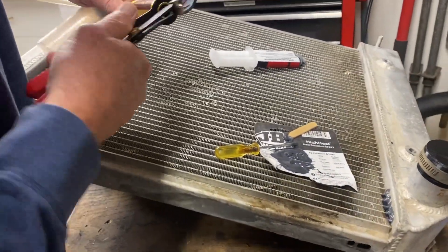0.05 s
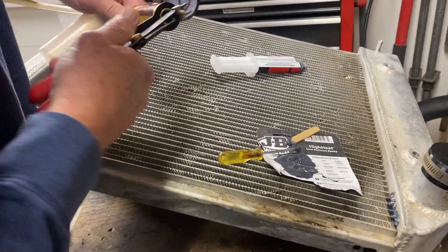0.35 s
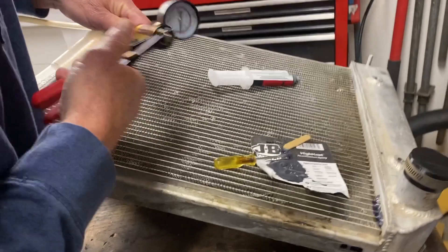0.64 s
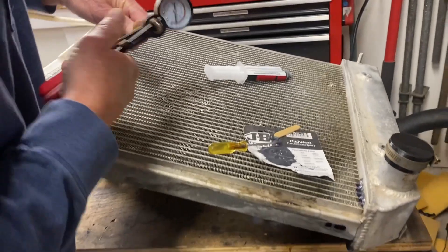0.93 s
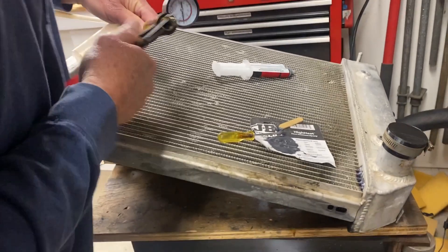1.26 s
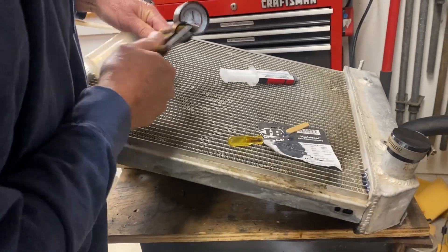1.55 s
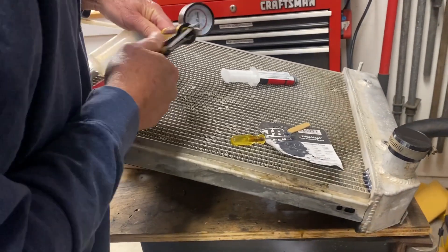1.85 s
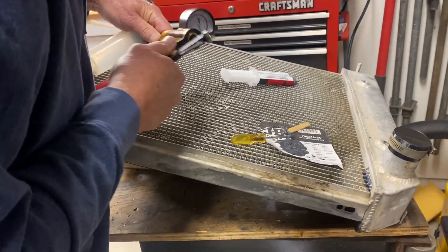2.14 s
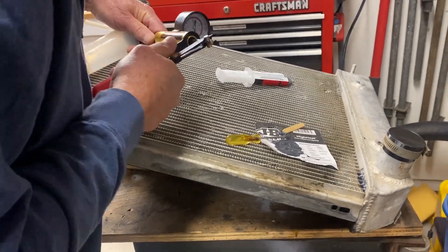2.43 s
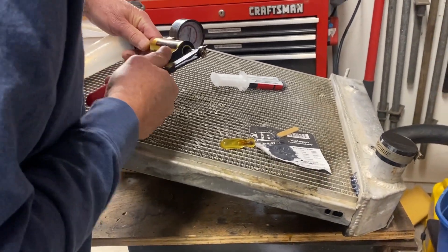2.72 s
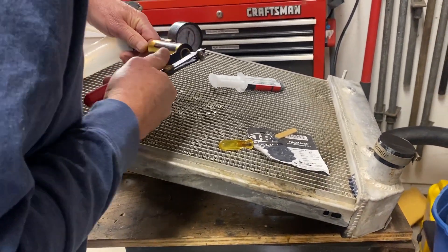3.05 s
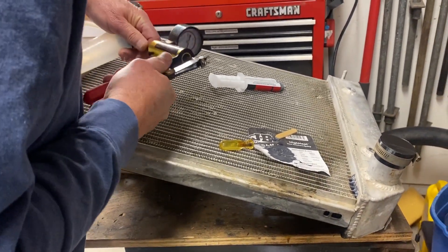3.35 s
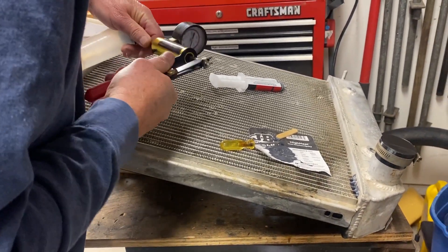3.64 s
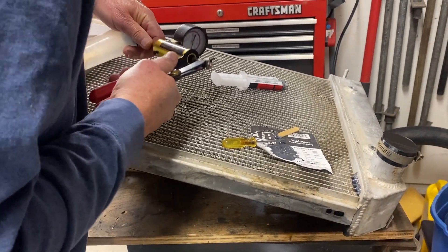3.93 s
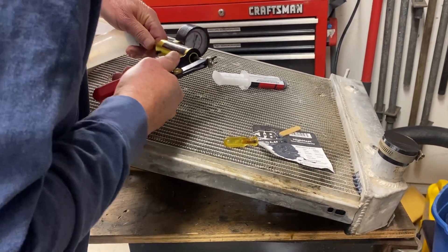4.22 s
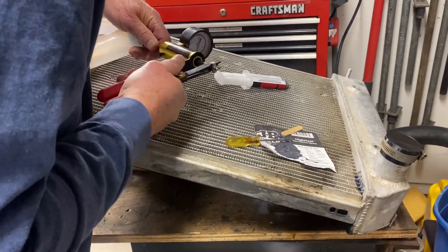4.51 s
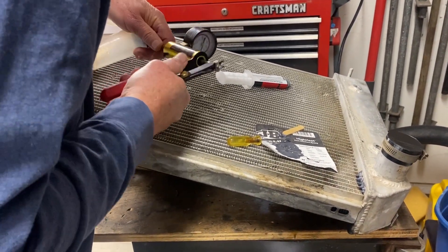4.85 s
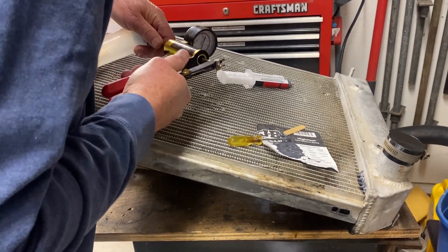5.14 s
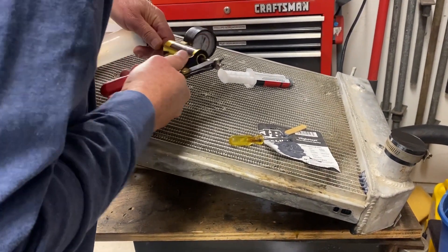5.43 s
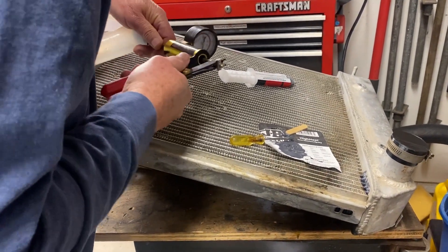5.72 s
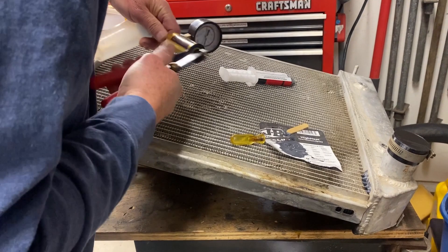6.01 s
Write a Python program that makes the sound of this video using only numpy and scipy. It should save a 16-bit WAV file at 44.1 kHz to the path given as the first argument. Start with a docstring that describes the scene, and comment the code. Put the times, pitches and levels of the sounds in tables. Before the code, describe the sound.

Steady, rapid popping clicks from a hand-worked vacuum pump, with brief air hisses and a faint spring ring, in a small room.

```python
"""A hand vacuum pump, hooked to an aluminium radiator on a workbench, is worked about 3.5 times a second.
On each release a spring drives the piston back: air hisses in through a lengthening chamber, then the
piston pops home with a metal clack and the spring rings. Each squeeze vents the chamber; most bring a
softer knock. As the vacuum builds, the pops rise in pitch and the air sounds fade. Sleeve and hands
rustle, the radiator now and then scrapes on the bench, and the small workshop reverberates."""
import sys
import numpy as np
from scipy import signal
from scipy.fft import rfft, irfft, next_fast_len
from scipy.io import wavfile
from scipy.ndimage import uniform_filter1d

SR = 44100
rng = np.random.default_rng(int(sys.argv[2]) if len(sys.argv) > 2 else 0)


def digitize_waveform(pressure):
    """Quantize a signal to 16-bit integers and store it at the path in sys.argv[1].

    Rows of a 2-D input are taken as channels; values are limited to [-1, 1].
    """
    field = np.atleast_2d(pressure).T
    bounded = np.clip(field, -1, 1)
    quanta = np.round(bounded * 32767).astype(np.int16)
    wavfile.write(sys.argv[1], SR, quanta)


N = 276507
TIME = np.arange(N) / SR
SIDES = np.array([[.5], [-.5]])  # splits a left-right difference between the channels

# piston landings: start_s, pop_db, clack_db, spring_db, hand_rub_db
STROKES = [(0.1076, -16, -29.5, -53, -62.5), (0.3689, -14, -29, -50.5, -54),
           (0.636, -16.5, -30.5, -53, -73), (0.9134, -14.5, -30, -60, -52), (1.1806, -16.5, -32, -53, -81),
           (1.4414, -13.5, -31, -60, -53.5), (1.7297, -15, -31, -45.5, -72), (1.9965, -17, -32, -52, -62),
           (2.2757, -18.5, -34.5, -48.5, -52.5), (2.5693, -16.5, -34, -52, -56),
           (2.8615, -16, -31, -50, -43), (3.163, -19.5, -34.5, -56, -53.5), (3.4701, -17, -31.5, -52, -61),
           (3.7709, -19, -34.5, -49.5, -65), (4.0575, -19, -31.5, -43, -59),
           (4.3476, -18.5, -31.5, -51.5, -60), (4.6474, -20, -35, -49, -58),
           (4.967, -21.5, -40, -50.5, -59.5), (5.265, -19.5, -34.5, -50.5, -53.5),
           (5.578, -20.5, -37.5, -54, -64), (5.9125, -19, -35, -47, -62), (6.231, -20.5, -38, -48.5, -58)]
# knocks of handle and valve as the grip closes: start_s, knock_db, rasp_db
SQUEEZES = [(0.23, -31.5, -48), (0.46, -38, -43.5), (0.478, -43, -35), (0.511, -32, -32),
            (0.762, -33.5, -49), (1.044, -46, -41.5), (1.32, -44, -55.5), (1.509, -35.5, -59),
            (1.561, -39.5, -50), (1.574, -32.5, -45), (1.591, -38.5, -46.5), (2.113, -63, -51),
            (2.13, -54, -35), (2.394, -42, -41.5), (2.411, -31.5, -38), (2.644, -37.5, -51.5),
            (2.689, -44, -37.5), (2.703, -44, -35), (3.299, -31, -46), (3.602, -30, -42), (3.892, -31, -47),
            (4.184, -30, -41.5), (4.475, -30.5, -50.5), (4.775, -29, -41.5), (4.785, -31.5, -43.5),
            (4.901, -43.5, -53.5), (5.048, -38.5, -57), (5.086, -32, -51.5), (5.411, -50, -34),
            (5.72, -32.5, -43.5), (6.05, -31, -46.5), (6.061, -35, -55)]


def amp(db):
    """Decibels to amplitude ratio."""
    return 10 ** (np.asarray(db) / 20)


def unit(x):
    """Normalisation to an rms of 1."""
    return x / np.sqrt(np.mean(x ** 2) + 1e-20)


def log_curve(points, hz):
    """Interpolation on a logarithmic frequency axis."""
    f, value = np.transpose(points)
    return np.interp(np.log(hz + 1), np.log(f + 1), value)


def curve(points, at):
    """Linear interpolation in a two-column table."""
    return np.interp(at, *np.transpose(points))


def add(mix, s, sound):
    """Superposition of a sound starting at time s."""
    part = mix[max(round(s * SR), 0):][:len(sound)]
    part += sound[:len(part)]


def slow_noise(size, span):
    """Noise low-passed by a moving average over span samples, at rms 1."""
    return unit(uniform_filter1d(rng.standard_normal(size), span))


def colour(x, spectrum, size=2048):
    """Minimum-phase filter with this spectral shape and a power gain of 1."""
    gain = unit(amp(log_curve(spectrum, abs(np.fft.fftfreq(size, 1 / SR)))))
    taps = np.fft.ifft(np.exp(signal.hilbert(np.log(gain)).conj())).real
    return signal.oaconvolve(x, taps[:size // 2])[:len(x)]


def resonate(x, hz, width_hz):
    """A damped resonator of peak gain 1 whose frequency may move."""
    turn = np.exp(2j * np.pi * np.cumsum(hz * np.ones(len(x))) / SR)
    pole = np.exp(-np.pi * width_hz / SR)
    return 2 * (turn * signal.lfilter([1 - pole], [1, -pole], x / turn)).real


def by_vacuum(law, s, evacuate_s=3.54):
    """Exponential evacuation: law is (starting value, change at full vacuum), read at time s."""
    start, change = law
    return start + change * (1 - np.exp(-s / evacuate_s))


def puff(t, hz, rise_s, sag, hold_s=.0046):
    """Chamber air oscillates briefly, sinks in pitch and is choked off; a small port radiates no bass."""
    envelope = (1 - np.exp(-t / rise_s)) * np.exp(-(t / hold_s) ** 4)
    pitch = hz * np.exp(-sag * (t / hold_s - .5))
    air = np.sqrt(2) * envelope * np.cos(2 * np.pi * np.cumsum(pitch) / SR)
    return signal.sosfilt(signal.butter(3, 620, "high", fs=SR, output="sos"), air)


def diffuse_noise(size):
    """A diffuse field is only partly coherent at two points: left and right noise."""
    # likeness of the two sides: frequency_hz, coherence
    coherence = [(60, 0.93), (400, 0.83), (1000, 0.31), (2000, 0.12), (5000, 0.13), (8000, 0.33),
                 (15000, 0.55)]
    a, b = rfft(rng.standard_normal((2, size)))
    same = np.clip(log_curve(coherence, np.fft.rfftfreq(size, 1 / SR)), -1, 1)
    return irfft(np.array([a, same * a + np.sqrt(1 - same ** 2) * b]), size)


def handling(tightest_s=.13, grip_width_s=.053, sway_db=5, rest_db=-72, uneven_db=2, crackle_db=4):
    """Contact noise: the handled microphone rumbles, sleeve and hands rustle; both swell each squeeze."""
    # rumble and rustle spectra: frequency_hz, density_db
    rumble_spectrum = [(20, -10), (55, 2.5), (85, 0), (180, 0.5), (300, 2.5), (500, -18), (1000, -1.5),
                       (4000, -70)]
    rustle_spectrum = [(100, -44), (500, 10), (950, 15), (1600, 14.5), (2500, 9.5), (3700, -4), (4600, 3),
                       (7000, 0.5), (10000, 1), (13000, -13), (16000, -36)]
    # low handling rumble on the microphone, strongest at the start and swelling as the radiator
    # scrapes: time_s, level_db
    rumble_level = [(0.0, -63.5), (2.76, -79), (3.18, -67), (3.61, -79), (5.41, -77), (6.27, -78)]

    def layer(spectrum, level):
        lumps = unit(uniform_filter1d(slow_noise(N, 1100), 600))
        noise = np.array([colour(side, spectrum)[:N] for side in diffuse_noise(next_fast_len(N))])
        return unit(noise) * level * amp(uneven_db * lumps)

    grip, rub, t = np.zeros(N), np.zeros(N), TIME[:SR // 3]
    swell = np.exp(-((t - tightest_s) / grip_width_s) ** 2)
    for s, *_, rub_db in STROKES:
        add(grip, s, swell)
        add(rub, s, amp(rub_db - 3) * swell)
    slips = unit(amp(crackle_db * slow_noise(N, 90)))
    rumble = layer(rumble_spectrum, amp(curve(rumble_level, TIME) + 1 + sway_db * grip))
    return rumble + layer(rustle_spectrum, amp(rest_db) + rub * slips)


def valve_ticks(lead_s=.085, decay_s=.0025, tick_db=(-51, -9.5), uneven_db=3,
                squeak_hz=1780, width_hz=120, squeak_db=-64, squeak_s=.0064):
    """A light impact: as the grip lets go, the valve flap seats with a tick and a faint squeak."""
    # tick spectrum: frequency_hz, density_db
    spectrum = [(300, -20), (1000, -7), (1800, -4), (3500, -14), (6000, -4), (7500, 3), (9000, -8),
                (16000, -14)]
    tick, squeak, t = np.zeros(N), np.zeros(N), TIME[:SR // 20]
    swell = t / squeak_s * np.exp(1 - t / squeak_s)
    for s, *_ in STROKES:
        tick_gain, squeak_gain = amp(uneven_db * np.clip(rng.standard_normal(2), -2, 2))
        snap, rub = rng.standard_normal((2, len(t)))
        tone = unit(resonate(resonate(rub, squeak_hz, width_hz), squeak_hz, width_hz))
        add(tick, s - lead_s, tick_gain * amp(by_vacuum(tick_db, s)) * np.exp(-t / decay_s) * snap)
        add(squeak, s - lead_s, squeak_gain * amp(squeak_db) * swell * tone)
    return colour(tick, spectrum) + squeak


def hose_plops(swell_s=.0056, low_hz=125, drop_hz=1100, knock_db=-25, flow_decay_s=1.04):
    """Dispersion: valves and knocks jolt the hose, which passes highs first, so each plop falls."""
    # valve closures around each landing: offset_s, rest_db, full_flow_extra_db
    closures = [(-.085, -81, 28), (0, -66, 21.5), (.055, -60, 19.5)]
    out, t = np.zeros(N), TIME[:SR // 20]
    envelope = t / swell_s * np.exp(1 - t / swell_s)
    jolts = [(s + offset, db + flow_db * np.exp(-s / flow_decay_s))
             for s, *_ in STROKES for offset, db, flow_db in closures]
    jolts += [(s, db + knock_db) for s, db, _ in SQUEEZES]
    for s, db in jolts:
        pitch = low_hz + drop_hz * np.exp(-t / rng.uniform(.004, .00523))
        flutter = 1 + slow_noise(len(t), 60)
        chirp = np.sin(2 * np.pi * (np.cumsum(pitch) / SR + rng.random()))
        add(out, s, amp(db) * envelope * flutter * chirp)
    return signal.sosfilt(signal.butter(2, 1500, fs=SR, output="sos"), out)


def intake(return_s=.07, shortest=.48, swell_s=.041, flow_db=(-54, -5.5),
           whistle_db=-2, hiss_db=15, ease_db=-10, gust_db=1.3, grit_db=1.75):
    """Resonances vary inversely with length: they fall as the piston runs back and air rushes in."""
    # air modes of the chamber at full length: pitch_hz, width_hz, level_db
    modes = [(958, 65, -0.5), (4580, 610, 2), (6900, 700, -17), (10200, 1100, -1)]
    # hiss spectrum: frequency_hz, density_db
    spectrum = [(300, -22.5), (1200, 12.5), (2500, -14), (3800, -11), (5500, -16), (7800, 14), (10000, 3),
                (12000, -4), (13800, -14), (15500, -7)]
    whistle, hiss, t = np.zeros(N), np.zeros(N), TIME[:SR // 10]
    for s, *_ in STROKES:
        jet, leak = rng.standard_normal((2, len(t)))
        rough_db = gust_db * slow_noise(len(t), 250) + grit_db * slow_noise(len(t), 25)
        run_s = return_s * (1 + .036 * rng.uniform(-1.2, 1))
        travel = np.minimum(t / run_s, 1)
        length = shortest + (1 - shortest) * travel ** 1.41  # share of the full length
        opening = np.sin(np.pi / 2 * np.minimum(t / swell_s, 1)) ** 2
        closing = np.minimum((1 - travel) * 20, 1)
        flow = opening * closing * unit(amp(rough_db)) * amp(by_vacuum(flow_db, s))
        air = np.zeros(len(t))
        for hz, width, db in modes:
            pitch = hz / length
            band = unit(resonate(resonate(jet, pitch, width), pitch, 2 * width))
            air += amp(db) * band / (1 + (pitch / 15000) ** 20)  # the whistle's modes fade out above about 15 kHz
        add(whistle, s - run_s + .0012, amp(whistle_db) * flow * air)
        add(hiss, s - run_s + .0014, amp(hiss_db + ease_db * travel) * flow * leak)
    return whistle + colour(hiss, spectrum)


def piston_pops(pitch_hz=(915.5, 79), scatter_hz=12):
    """Cavity resonance: the landing piston drives out the last air; the pitch rises with the vacuum."""
    # modes of the pump body: pitch_hz, width_hz, level_db
    modes = [(978, 29, -9), (1286, 29, 5), (1730, 43, -36), (1933, 45, 12.5)]
    out, t = np.zeros(N), TIME[:SR // 50]
    for s, db, *_ in STROKES:
        hz = by_vacuum(pitch_hz, s) + scatter_hz * rng.uniform(-.79, 1)
        add(out, s, amp(db + 2) * puff(t, hz, rise_s=.001, sag=.17))
    return out + sum(amp(db) * resonate(out, hz, width) for hz, width, db in modes)


def piston_clacks(seat_s=.0039, crack_s=.0021, rattle_s=.01, rattle_db=-8):
    """Brief impacts are broadband: metal meets metal, seats a moment later, and the linkage rattles."""
    # clack spectrum: frequency_hz, density_db
    spectrum = [(100, -19.5), (400, -18), (1400, 11.5), (2000, -6), (2600, -3), (3100, 6), (3650, -10),
                (4600, 5), (6000, -2), (7200, -3.5), (10000, -2), (12500, -12), (14000, -14), (16000, -16)]
    out, t = np.zeros(N), TIME[:SR // 10]
    seating = (t > seat_s) * np.exp(-abs(t - seat_s) / crack_s)
    envelope = np.exp(-t / crack_s) + seating + amp(rattle_db) * np.exp(-t / rattle_s)
    for s, _, db, *_ in STROKES:
        add(out, s, amp(db + 2) * envelope * rng.standard_normal(len(t)))
    return colour(out, spectrum)


def spring_ring(build_s=.003, uneven_db=2):
    """Free vibration: each landing rings the spring; its coils touch, so the ring is rough and varies."""
    # modes of the spring and steel handle: pitch_hz, level_db, t60_s
    modes = [(2910, 2, 0.29), (3126, 19.5, .13), (3253, 14, 0.19), (3320, 6.5, 0.31), (3560, -29, .18),
             (4460, 3.5, 0.24), (5500, -6, 0.31), (5460, -8, 0.19)]
    out, t = np.zeros(N), TIME[:SR // 3]
    hz, db, t60 = np.transpose(modes)[:, :, None]
    envelopes = amp(db - 60 * t / t60) * (1 - np.exp(-t / build_s))
    for s, _, _, level_db, _ in STROKES:
        scatter = rng.standard_normal((len(modes), 1))  # varies each mode's level and phase
        wander = np.cumsum(rng.standard_normal(envelopes.shape), 1) / 250
        partials = np.sin(2 * np.pi * (hz * t + wander + scatter))
        ring = (envelopes * amp(uneven_db * scatter) * partials).sum(0)
        add(out, s, amp(level_db) * ring / np.std(ring[:SR // 30]))
    return out


def exhaust(delay_s=.01, length_s=.13, flow_db=(-51, -8)):
    """Flow noise: while the grip closes, the chamber empties through its vent."""
    # vent spectrum: frequency_hz, density_db
    spectrum = [(300, -40), (700, 11.5), (1100, 16.5), (1400, 4), (2000, -13.5), (2700, -8), (3700, -5),
                (4700, -19), (8000, -4.5), (15000, -21.5)]
    flow = np.zeros(N)
    for s, *_ in STROKES:
        add(flow, s + delay_s, signal.windows.tukey(int(length_s * SR), .5))
    return colour(flow * amp(by_vacuum(flow_db, TIME)) * rng.standard_normal(N), spectrum)


def grip_knocks(pitch_hz=(908, 180), rise_s=.0008, decay_s=.007, grain_db=3):
    """Impact and stick-slip: the closing grip knocks on the chamber and the steel pivot rasps."""
    # rasp spectrum: frequency_hz, density_db
    spectrum = [(100, -9), (400, -5.5), (1000, 21.5), (1800, -11), (2300, 3.5), (3100, 1), (3650, -4.5),
                (4600, -2), (6500, -4.5), (10000, 3), (13000, -11), (16000, -21)]
    # modes of the pivot: pitch_hz, width_hz, level_db
    modes = [(1772, 96, 10.5), (3075, 53.4, 11), (4524, 200, 8.5), (5510, 130, -1)]
    knock, rasp, t = np.zeros(N), np.zeros(N), TIME[:SR // 12]
    envelope = (1 - np.exp(-t / rise_s)) * np.exp(-t / decay_s)
    for s, knock_db, rasp_db in SQUEEZES:
        slips = unit(amp(grain_db * slow_noise(len(t), 30)))
        add(knock, s, amp(knock_db + 3) * puff(t, by_vacuum(pitch_hz, s), rise_s, sag=.0053))
        add(rasp, s - .001, amp(rasp_db + 5) * envelope * slips * rng.standard_normal(len(t)))
    ring = sum(amp(db) * resonate(rasp, hz, width) for hz, width, db in modes)
    return knock + colour(rasp, spectrum) + ring


def radiator_scrape(slips_per_s=900, rise_s=.0021, fade_s=.016):
    """Stick-slip friction: dense slips ring the radiator, first as two early squeezes shake it, then as it
    shifts on the wood in short jerks."""
    # the radiator rung by two early squeezes, then jerks across the bench: start_s, level_db
    jerks = [(.46, -49.5), (0.509, -47), (2.949, -35), (2.994, -36), (3.016, -44), (3.17, -37.5),
             (3.222, -55)]
    # modes of the radiator: pitch_hz, width_hz, level_db
    modes = [(301, 16, -16), (444, 14, 0.5), (490, 100, -6.5), (660, 140, 3.5), (962, 87, 2.5),
             (1390, 65, -11), (1920, 300, -29)]
    speed, t = np.zeros(N), TIME[:SR // 8]
    for s, db in jerks:
        add(speed, s, amp(db - 4) * (1 - np.exp(-t / rise_s)) * np.exp(-t / fade_s))
    sizes = rng.uniform(.16, 1, N) * rng.choice([-1, 1], N)
    force = speed * unit(sizes * (rng.random(N) < slips_per_s / SR))
    body = sum(amp(db) * np.sqrt(SR / (np.pi * width)) * resonate(force, hz, width)
               for hz, width, db in modes)
    return signal.sosfilt(signal.butter(6, [220, 2300], "band", fs=SR, output="sos"), body)


def early_reflections(x, dull_hz=3000):
    """Specular reflection: radiator, bench and tool chest return single, slightly dulled echoes."""
    # echoes from near surfaces: delay_s, level_db, left_lead_s
    echoes = [(.0062, -16.5, .0002), (.0085, -48, -.0002), (.0118, -31.5, 0.0037), (.0185, -18, 0.00095),
              (0.0262, -16.5, 0.022), (0.038, -44, 0)]
    out = np.zeros((2, N))
    dulled = signal.sosfilt(signal.butter(1, dull_hz, fs=SR, output="sos"), x)
    for delay, db, lead in echoes:
        add(out[0], delay - lead / 2, amp(db) * dulled)
        add(out[1], delay + lead / 2, amp(db) * dulled)
    return out


def workshop(x, gap_s=.0065, near_db=-10, near_t60_s=.073, far_db=-18, turn_hz=.596, responses=3):
    """Reverberation: quick scatter off radiator and bench, then a tail; both shift as the pump moves."""
    # decay of the room: frequency_hz, t60_s
    decay_times = [(100, 0.28), (400, 0.53), (1000, 0.36), (3000, 0.62), (8000, 0.24), (15000, 0.21)]
    out = np.zeros((2, N))
    for k in range(responses):
        hz, t, bands = signal.stft(diffuse_noise(SR * 3 // 4), SR, nperseg=256)
        decay = amp(-60 * t / log_curve(decay_times, hz)[:, None])
        far = signal.istft(bands * decay, SR, nperseg=256)[1]
        t = TIME[:far.shape[1]]
        near = diffuse_noise(len(t)) * amp(-60 * t / near_t60_s)
        echo = amp(near_db) * unit(near * (t > gap_s)) + amp(far_db) * unit(far * (t > gap_s))
        crossfade = np.sqrt(2 / responses) * np.cos(np.pi * (turn_hz * TIME + k / responses))
        out += signal.fftconvolve((x * crossfade)[None], echo / np.sqrt(len(t)), axes=1)[:, :N]
    return out


def scene():
    """Direct and reflected sound superpose; the pump drifts from the left to just past the centre."""
    # stereo balance: time_s, left_minus_right_db
    drift = [(0, 2.6), (.7, .8), (1.5, -.4), (3.5, -.9), (6.2, -1.6)]
    pops = piston_pops()
    steel = piston_clacks() + spring_ring() + intake() + valve_ticks()
    grip = grip_knocks() + radiator_scrape() + exhaust()
    direct = pops + steel + grip + hose_plops()
    # directivity: the pop is aimed at the listener; the rest radiates all round and sounds wetter
    wet = workshop(amp(1.5) * pops + amp(3.5) * steel + amp(4.5) * grip) + early_reflections(direct)
    return (direct + wet) * amp(SIDES * curve(drift, TIME)) + handling()


def record(dry, bass_cut_hz=42, edge_hz=16100):
    """Linear filtering: two microphone ports differ in phase and level; bass and top are then cut."""
    # phase between the ports: frequency_hz, left_lead_rad
    lead = [(0, 0), (1300, .45), (1600, -.1), (2400, .4), (3200, 1.3), (3800, .3), (5600, .5), (7000, -.5),
            (8400, -3.14), (10100, -6.28), (12000, -9.42), (14000, -12.57), (15200, -14.2), (16000, -14.4)]
    # level between the ports: frequency_hz, left_minus_right_db
    tilt = [(300, 0), (900, 2.5), (2500, 4), (5500, 4), (7000, 0.5), (8000, 0.5), (9000, 0.5)]
    size = next_fast_len(N + 4096)
    hz = np.fft.rfftfreq(size, 1 / SR)
    ports = amp(SIDES * log_curve(tilt, hz)) * np.exp(1j * SIDES * curve(lead, hz))
    heard = irfft(rfft(dry, size) * ports, size)[:, :N]
    heard = signal.sosfilt(signal.butter(2, bass_cut_hz, "high", fs=SR, output="sos"), heard)
    band_limit = signal.firwin(511, edge_hz, window=("kaiser", 9), fs=SR)
    return signal.oaconvolve(heard, band_limit[None], "same")


dry = scene()
out = record(dry)
digitize_waveform(out)
```